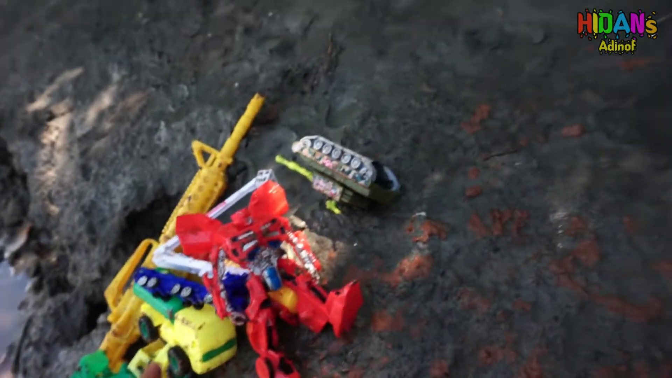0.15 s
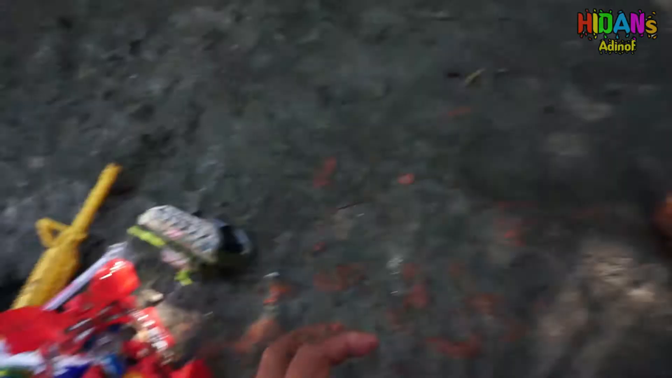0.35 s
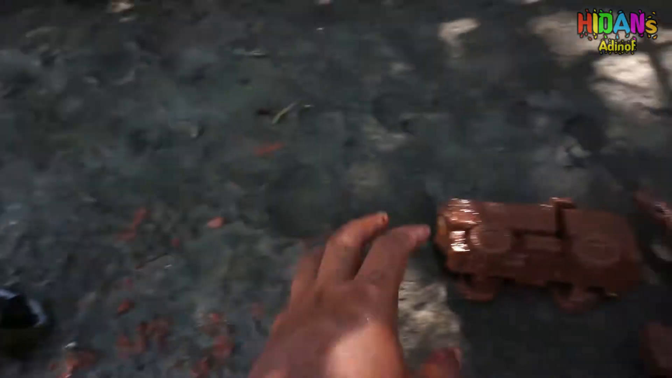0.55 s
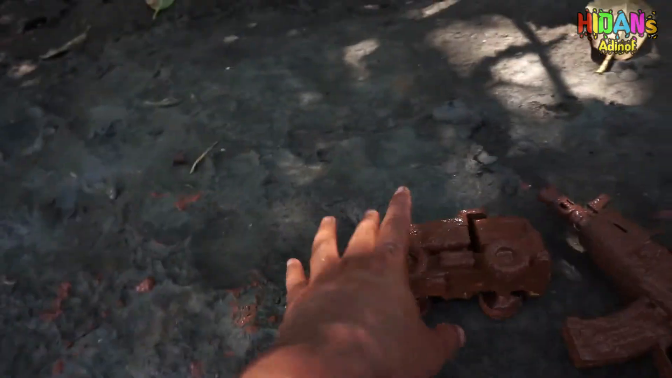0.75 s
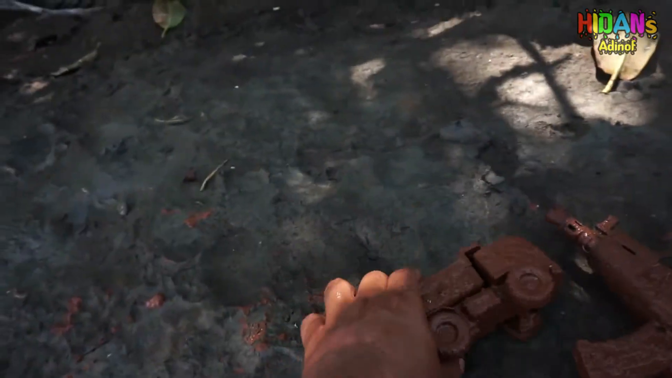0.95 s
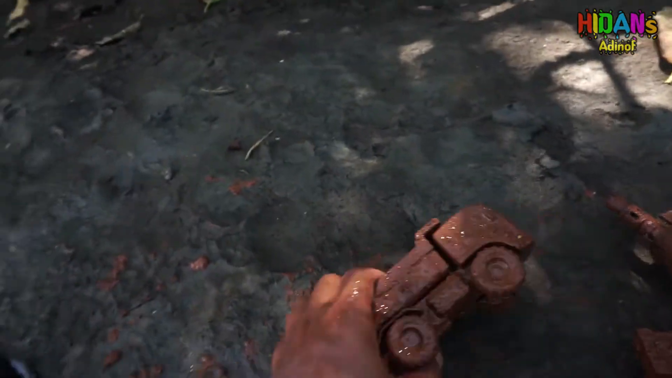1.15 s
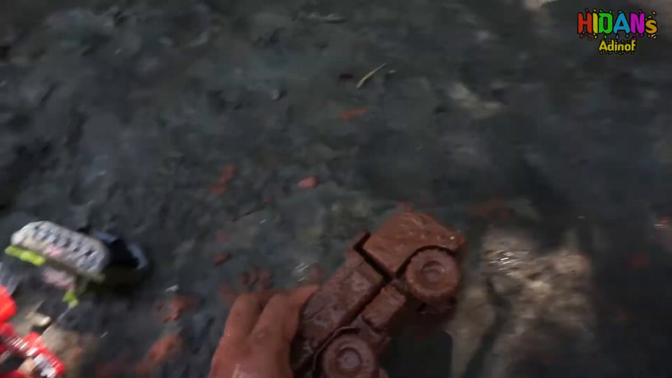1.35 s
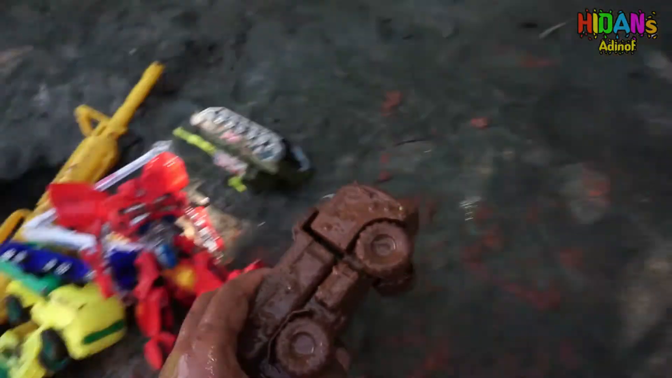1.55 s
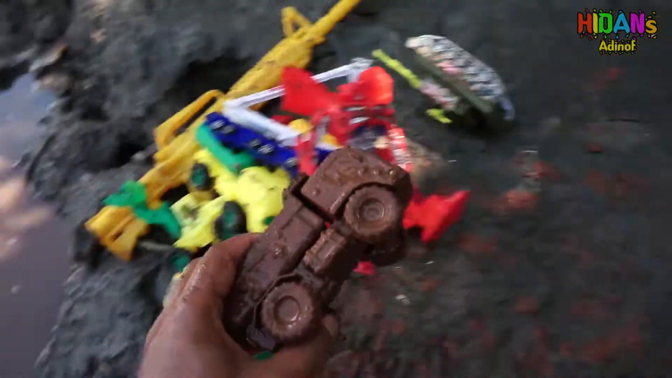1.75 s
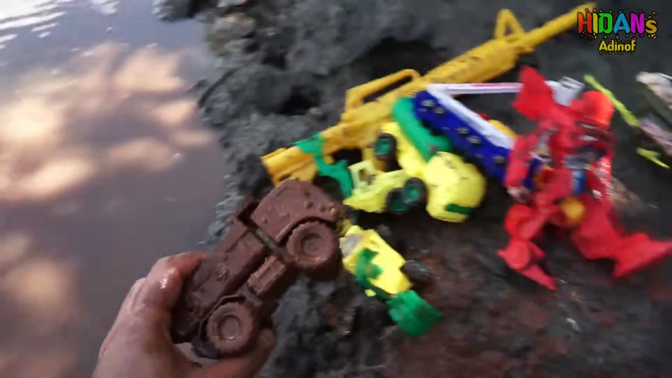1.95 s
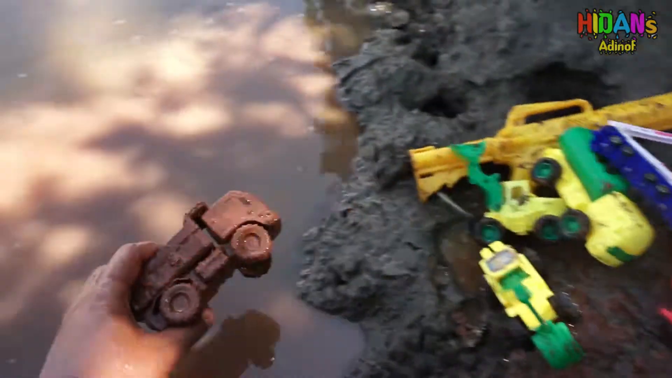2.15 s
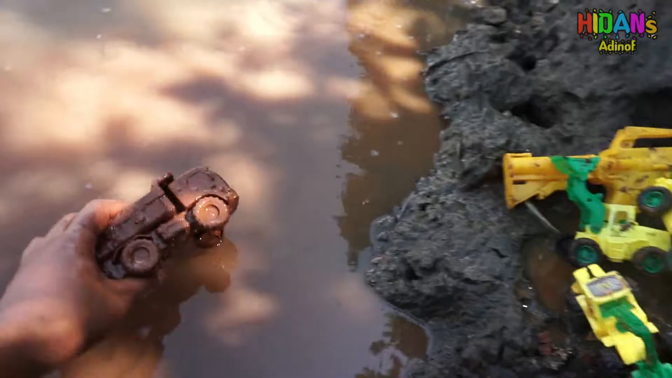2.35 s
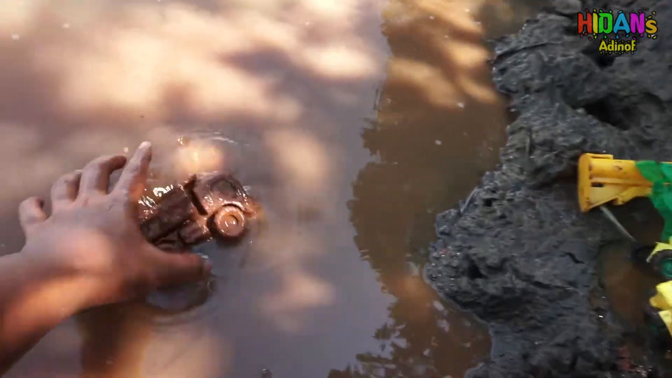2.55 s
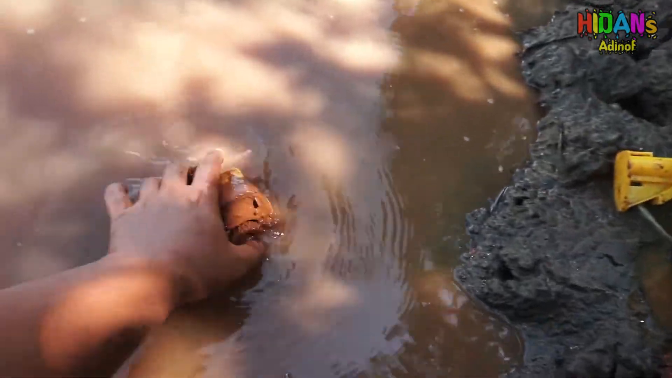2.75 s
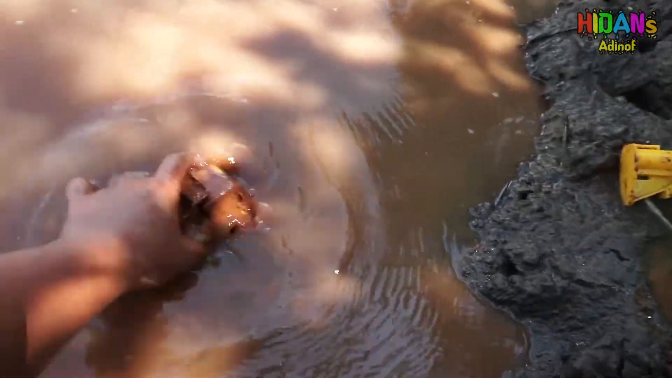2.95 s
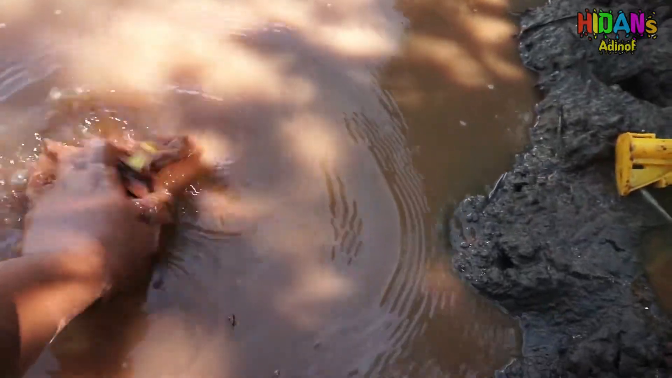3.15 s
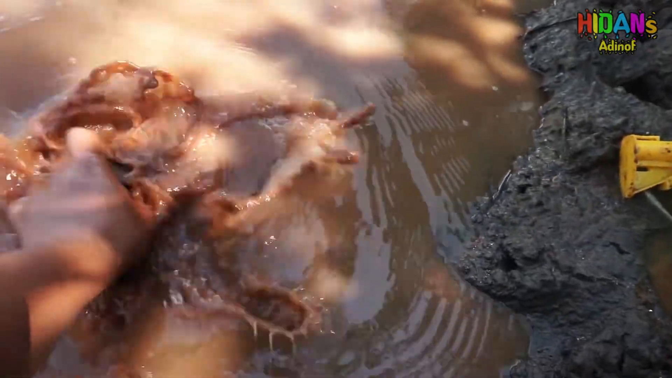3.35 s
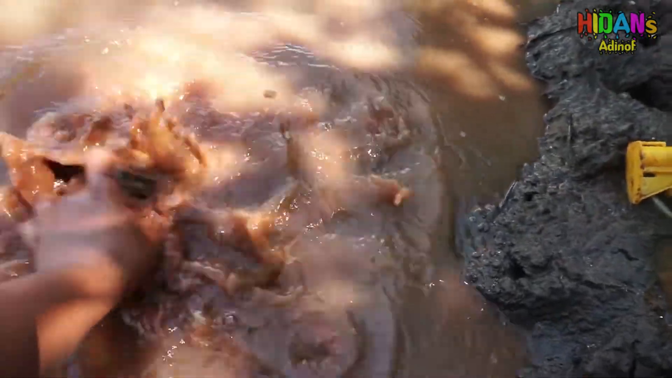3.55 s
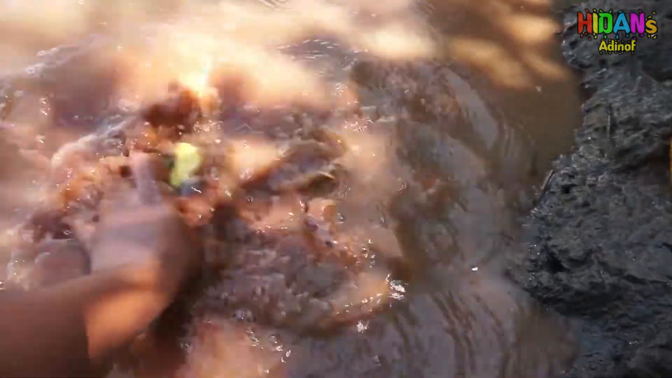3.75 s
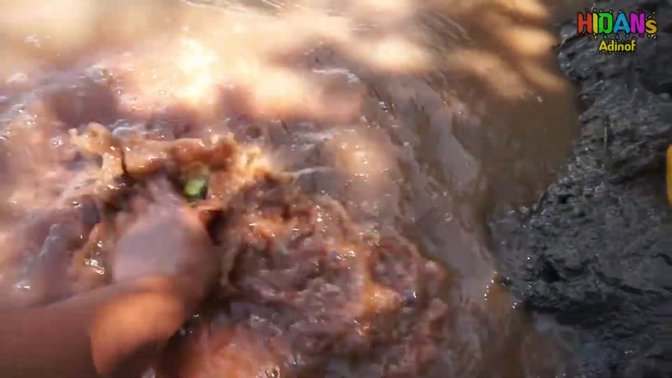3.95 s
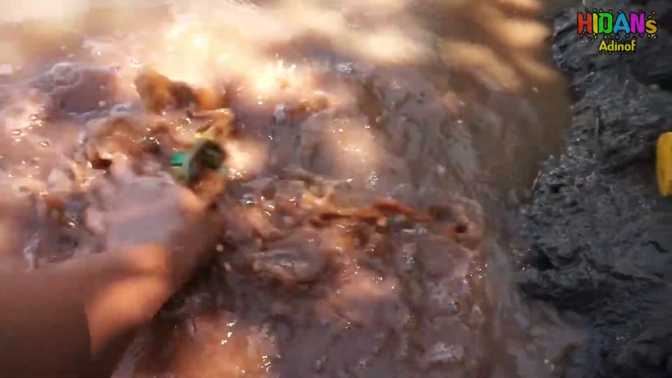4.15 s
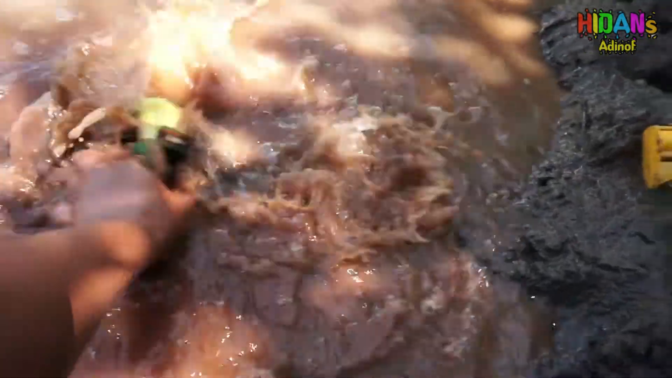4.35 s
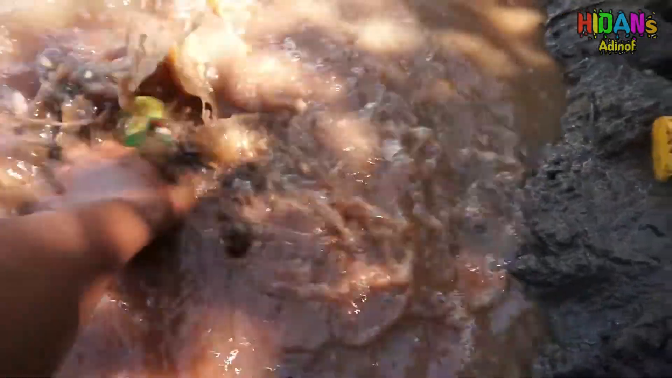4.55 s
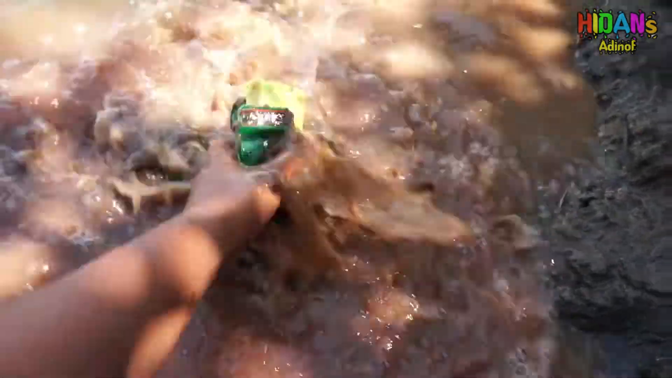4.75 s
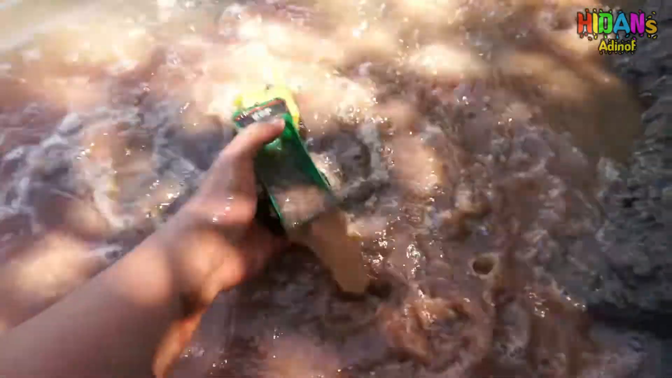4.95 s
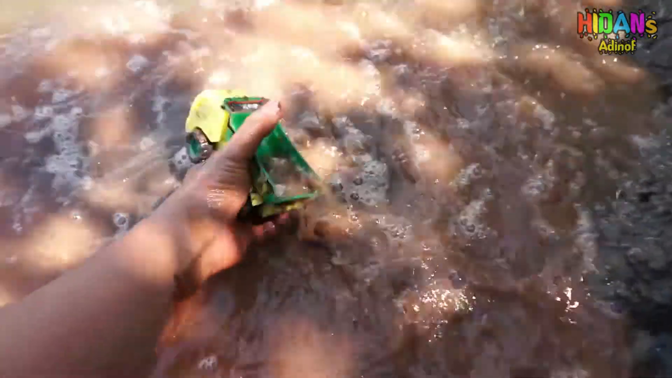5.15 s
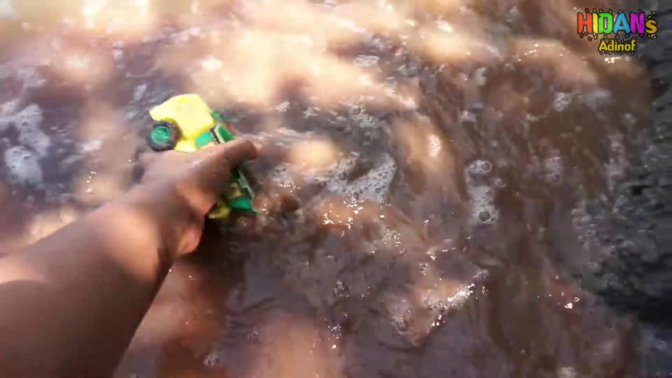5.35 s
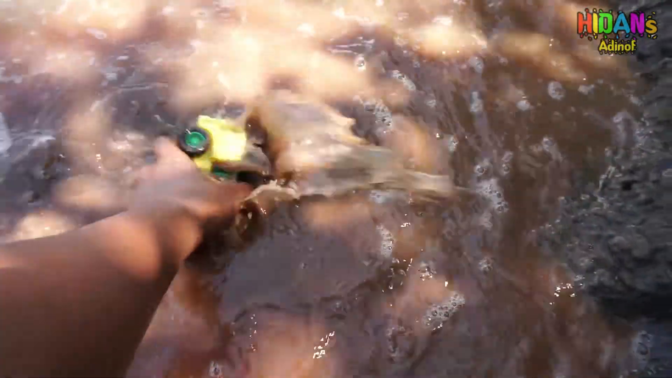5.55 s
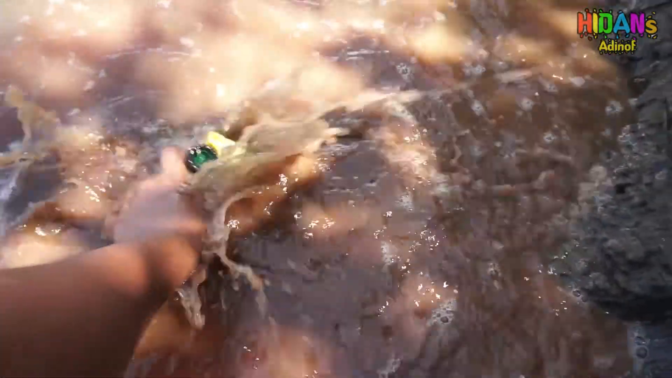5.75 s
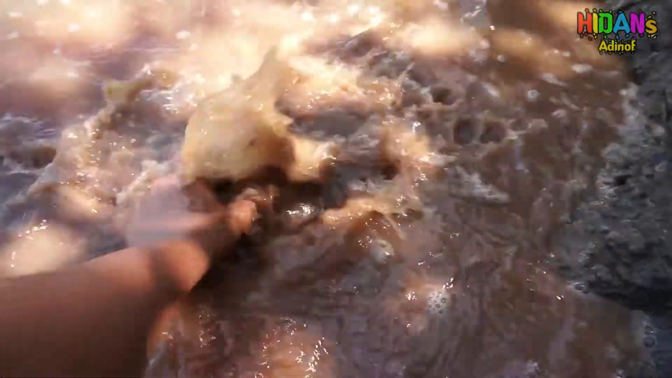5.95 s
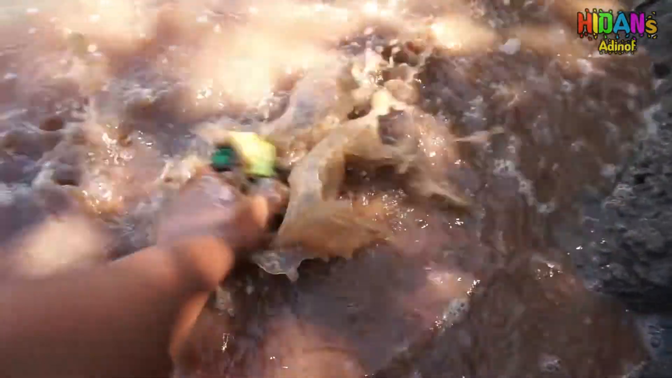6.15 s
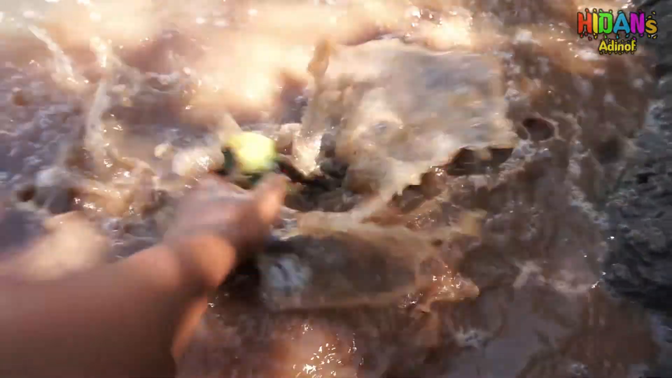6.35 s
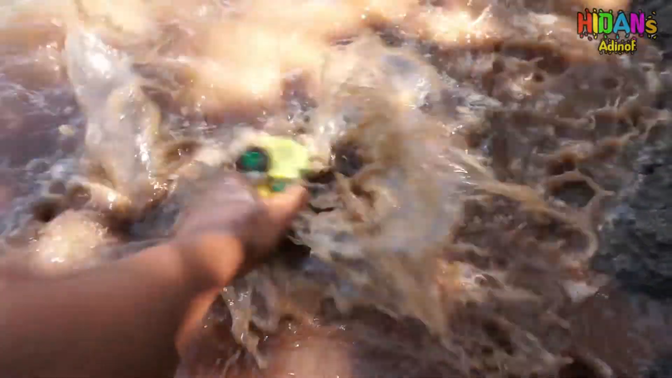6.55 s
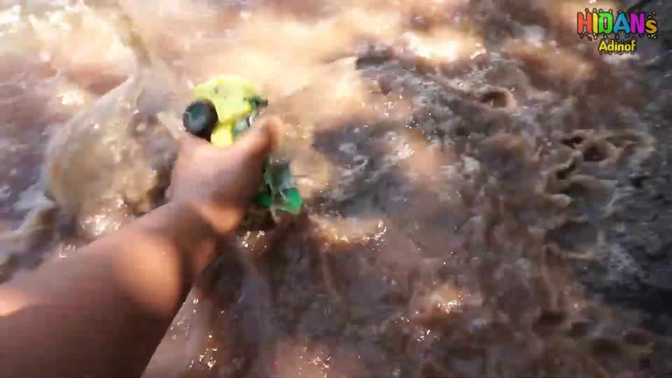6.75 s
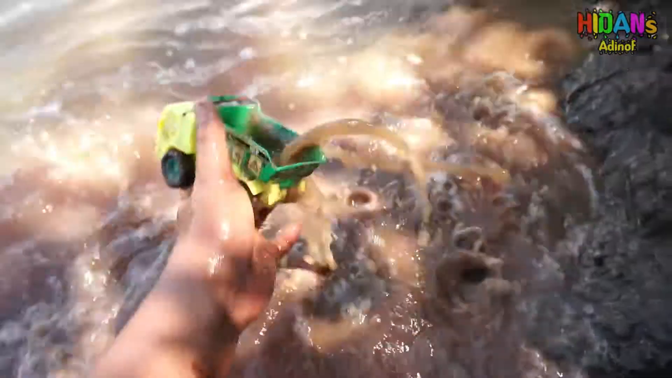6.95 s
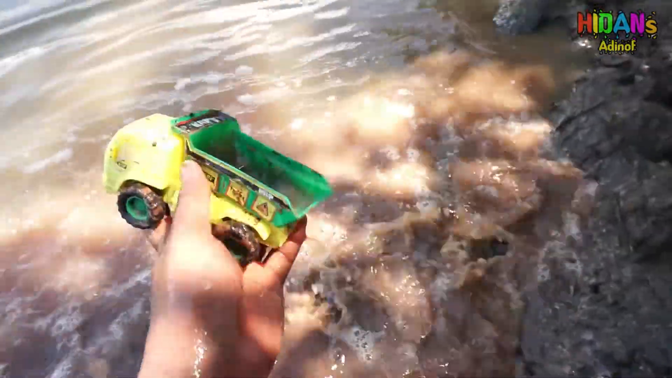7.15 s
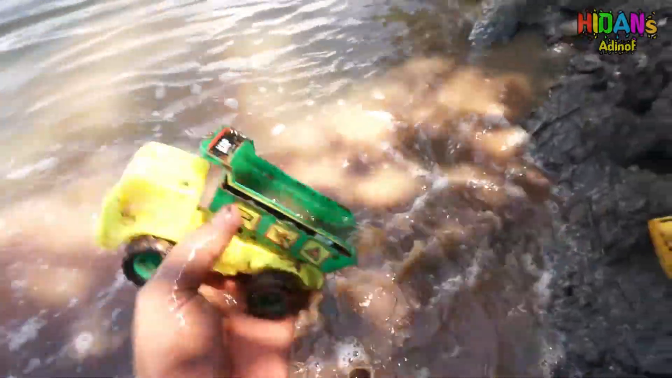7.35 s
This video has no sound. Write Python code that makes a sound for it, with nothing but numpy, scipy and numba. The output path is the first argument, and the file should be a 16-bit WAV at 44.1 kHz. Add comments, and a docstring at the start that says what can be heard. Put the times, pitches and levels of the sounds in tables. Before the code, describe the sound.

Outdoors beside shallow muddy water, soft low traffic and steady airy leaves lie far behind. From 0 to about 1 s a thin hiss with ringing metallic bands fades out, while hollow plastic toys tick and knock lightly, clearest near 0.15 and 0.35 s. Around 0.9 s fingers rustle faintly on a muddy truck. A faint high insect buzz passes at 1.3-1.6 s, with barely audible cricket and distant bird tones. At 2.5 s the truck plops into water, left of the close handheld stereo microphone. Small splashes start near 3.1 s and become fast, vigorous swishing from 3.5 to 4.9 s, with deep gurgles, bright spray, bubbles, snapping drops and dull plastic knocks. It calms around 5.1-5.4 s, surges again from 5.5 to 6.8 s, then thins into light splashes and drips until 7.5 s.

```python
"""First a ringing hiss fades over far traffic while plastic toys tick and knock on a muddy bank.
Fingers rustle on a muddy toy truck; then it is dipped and shaken in shallow water, left of a hand-held camera.
Splashes are bands of noise and small random bubbles, driven by level curves; single bubbles, drops and
plastic knocks are short damped sines. Insects and a far bird are thin unsteady tones and narrow noise;
traffic, air and leaves are coloured stereo noise. The microphone keeps nothing above its band limit."""
import sys
import numpy as np
from scipy import signal
from scipy.fft import rfft, irfft, next_fast_len
from scipy.io import wavfile
from scipy.ndimage import map_coordinates
from numba import njit

SR = 44100
rng = np.random.default_rng(int(sys.argv[2]) if len(sys.argv) > 2 else 0)


def store_wav(level_fs):
    """Save 16-bit WAV to argv[1]."""
    pcm = np.round(np.clip(np.atleast_2d(level_fs), -1, 1) * 32767)
    wavfile.write(sys.argv[1], SR, pcm.T.astype(np.int16))


N = 330309  # length [samples]
CENTRED = [(1000, 0)]  # no lead between left and right: (frequency [Hz], phase [rad])


# thuds, splashes and the churn between them, all before the unevenness of the water:
# each plunge of the truck makes the water thump: (time [s], level [dB])
PLUNGE_EVENTS = [(2.464, -41.5), (2.528, -47), (2.588, -45), (3.469, -39.5), (3.567, -35.5), (3.681, -32.5),
                 (3.784, -39), (3.873, -39), (4.076, -34.5), (4.276, -30), (4.374, -31.5), (4.471, -36),
                 (4.572, -27), (5.675, -37.5), (5.761, -34), (5.858, -35), (5.968, -31.5), (6.097, -38.5),
                 (6.155, -38), (6.236, -55), (6.365, -40), (6.47, -40), (6.568, -48), (6.725, -39),
                 (7.404, -46)]
# each shake of the hand throws a splash: (start [s], length [s], gurgle level [dB], spray level [dB])
SPLASH_EVENTS = [(2.474, 0.0073, -35, -32), (2.562, 0.041, -50, -52), (2.985, 0.045, -44, -58),
                 (3.144, 0.04, -30.5, -40.5), (3.247, 0.044, -38, -46), (3.298, 0.018, -35, -36.5),
                 (3.344, 0.043, -47, -30.5), (3.395, 0.022, -49, -36), (3.543, 0.055, -32, -34),
                 (3.674, 0.018, -27.5, -35), (3.768, 0.019, -32, -31.5), (3.87, 0.0082, -27.5, -29),
                 (3.948, 0.032, -42.5, -31), (4.057, 0.016, -33.5, -32), (4.168, 0.065, -36.5, -31),
                 (4.251, 0.042, -27, -30.5), (4.361, 0.027, -26, -26.5), (4.467, 0.032, -29, -29.5),
                 (4.581, 0.041, -29.5, -25), (4.7, 0.044, -40, -30), (4.835, 0.023, -43, -30),
                 (4.903, 0.028, -39, -37.5), (5.008, 0.029, -40.5, -37), (5.193, 0.022, -55, -51),
                 (5.25, 0.03, -59, -49), (5.34, 0.019, -60, -40.5), (5.49, 0.032, -39.5, -30),
                 (5.549, 0.051, -37.5, -32.5), (5.658, 0.02, -36.5, -26), (5.783, 0.071, -27, -34),
                 (5.855, 0.017, -35, -26.5), (5.963, 0.035, -31.5, -34), (6.043, 0.044, -32, -27.5),
                 (6.121, 0.061, -32.5, -30.5), (6.229, 0.021, -36, -23.5), (6.338, 0.024, -28.5, -32),
                 (6.394, 0.017, -33, -55), (6.455, 0.039, -35, -25.5), (6.531, 0.11, -40, -28.5),
                 (6.602, 0.038, -30, -41), (6.674, 0.039, -33, -27.5), (6.725, 0.013, -51, -24),
                 (6.832, 0.041, -43, -29.5), (6.946, 0.028, -45, -43), (7.083, 0.033, -43, -35.5),
                 (7.122, 0.017, -43, -33), (7.175, 0.072, -55, -35.5), (7.388, 0.017, -51, -38.5),
                 (7.453, 0.022, -46, -37)]
# the water keeps churning between splashes: (time [s], gurgle level [dB], spray level [dB])
CHURN_LEVELS = [(2.9, -50, -65), (3.0, -51, -58), (3.08, -44.5, -47), (3.21, -40.5, -46.5),
                (3.31, -39.5, -43), (3.45, -36.5, -37), (3.97, -37.5, -44.5), (4.2, -32.5, -35.5),
                (4.41, -36.5, -32.5), (4.79, -43, -33.5), (5.05, -49, -38), (5.29, -50.5, -39),
                (5.64, -41.5, -45), (5.98, -40.5, -34.5), (6.4, -44, -31.5), (6.58, -44, -29),
                (6.79, -43, -37.5), (6.88, -43, -36), (7.09, -69, -35.5), (7.49, -46, -42.5)]
# colours of the four layers, deepest first: (frequency [Hz], density [dB per Hz])
THUMP_COLOUR = [(100, -43), (170, 8), (280, -1.5), (393, 5), (480, 1), (520, -10), (680, -44), (1140, -120)]
GURGLE_COLOUR = [(310, -42), (520, -15), (673, 3), (1100, 1.5), (1260, -1.5), (1700, -9), (2210, -32),
                 (3740, -120)]
SLOSH_COLOUR = [(760, -10.5), (1300, -2), (1600, 0.5), (2020, 0.5), (2450, 3), (2720, -0.5), (3490, -6),
                (4500, -9), (5850, -8), (9900, -120)]
SPRAY_COLOUR = [(2060, -3), (3500, 4), (4870, 2.5), (6560, 1.5), (11400, 2.5), (13400, 0.5), (15100, -5),
                (15700, -1), (16200, 4), (16500, -30)]
SLOSH_FROM_SPRAY, SLOSH_DB = 0.59, 0.5  # the slosh level lies this share of the way from gurgle to spray
PLUNGE_S, THUMP_UNDER_GURGLE_DB = 0.011, 14.5


def stirred_water():
    """Thump, gurgle, slosh and spray: each shake drives deep and bright water along its own level curve."""
    t = np.arange(N) / SR
    gate, low_db, high_db = curves(CHURN_LEVELS)
    closed_db = -80 * (1 - gate)
    low_db, high_db = low_db + closed_db, high_db + closed_db
    start, length, gurgle_db, spray_db = np.transpose(SPLASH_EVENTS)
    plunge_s, plunge_db = np.transpose(PLUNGE_EVENTS)

    def between(low, high):
        return SLOSH_DB + low + SLOSH_FROM_SPRAY * (high - low)

    # slopes are (rise, fall) in dB per second
    thump = surges(plunge_s, PLUNGE_S, plunge_db, (380, 700), low_db - THUMP_UNDER_GURGLE_DB)
    gurgle = surges(start, length, gurgle_db, (730, 350), low_db)
    slosh = surges(start, length, between(gurgle_db, spray_db), (1050, 274), between(low_db, high_db))
    spray = surges(start, length, spray_db, (1050, 320), high_db)
    wash = stirred(thump, lean("thump", t), THUMP_COLOUR, count=900, centre_hz=341, octaves=0.88,
                   cycles=7.7, uneven_db=3.0, grain_share=0.79, flutter_db=-1.5)
    wash += stirred(gurgle, lean("gurgle", t), GURGLE_COLOUR, count=1700, centre_hz=894, octaves=1.8,
                    cycles=12.4, uneven_db=2.0, grain_share=0.61, flutter_db=2.5)
    wash += stirred(slosh, lean("slosh", t), SLOSH_COLOUR, count=3500, centre_hz=2400, octaves=2.126,
                    cycles=20.7, uneven_db=3.0, grain_share=0.53, flutter_db=1.5)
    wash += stirred(spray, lean("spray", t), SPRAY_COLOUR, count=12000, centre_hz=7660, octaves=2.54,
                    cycles=7.6, uneven_db=2.5, grain_share=0.48, flutter_db=2.0)
    return wash


# single bubbles: (time [s], relative level [dB], pitch [Hz])
SINGLE_BUBBLES = [(2.456, -23.5, 453), (2.524, -27, 399), (2.581, -43, 404), (4.265, -26, 406),
                  (2.457, -20.5, 787), (2.482, -20, 1415), (2.519, -31, 813), (2.561, -32, 720),
                  (2.773, -27, 1420), (2.906, -42, 840), (2.961, -29, 1340), (2.998, -29, 686),
                  (3.075, -32, 1260), (3.118, -24, 830), (3.252, -17.5, 817), (3.351, -12.5, 876),
                  (3.453, -25, 870), (3.469, -11.5, 1005), (3.531, -22, 1460), (3.619, -24, 1370),
                  (3.668, -14.5, 670), (3.739, -23, 680), (3.757, -13, 770), (3.861, -23, 1090),
                  (3.999, -34, 1140), (4.047, -29, 1090), (4.146, -31, 1080), (4.165, -33, 780),
                  (4.235, -27, 972), (4.255, -20, 625), (4.362, -9.5, 1044), (4.39, -12, 961),
                  (4.445, -21, 674), (4.465, -21, 1080), (4.528, -17, 670), (4.555, -16, 730),
                  (4.59, -20, 867), (4.693, -22, 1016), (4.79, -21.5, 742), (4.829, -26, 702),
                  (4.975, -28, 663), (5.005, -25, 1460), (5.062, -26, 865), (5.167, -23, 1294),
                  (5.34, -30, 730), (5.363, -24, 1290), (5.411, -34, 1190), (5.553, -22.5, 754),
                  (5.65, -25, 740), (5.667, -14.5, 918), (5.705, -20, 1060), (5.754, -16, 740),
                  (5.849, -20, 1430), (5.982, -19, 1140), (6.038, -20, 1510), (6.142, -18, 1070),
                  (6.16, -17, 697), (6.224, -19, 1260), (6.316, -23, 1370), (6.34, -13, 1330),
                  (6.393, -20, 697), (6.462, -20, 960), (6.569, -8.5, 970), (6.609, -13, 1450),
                  (6.702, -24, 888), (7.079, -21, 1490), (7.164, -33, 1090), (7.257, -27.5, 1060),
                  (2.4572, -24, 2580), (2.4811, -19, 1620), (2.774, -28, 2160), (3.1187, -26, 2310),
                  (3.1352, -20, 2430), (3.1576, -16, 2420), (3.2414, -21, 2450), (3.2903, -17, 3080),
                  (3.3068, -14.5, 1910), (3.5098, -16, 2170), (3.5457, -19, 1480), (3.6724, -19, 2300),
                  (3.7572, -22, 1820), (3.7647, -14, 1950), (3.861, -15, 1650), (3.9229, -16, 1740),
                  (3.9987, -22, 2210), (4.071, -21, 1740), (4.103, -9.5, 2240), (4.1643, -13, 2270),
                  (4.1943, -11, 2310), (4.2137, -14.5, 2290), (4.2566, -15, 2300), (4.3624, -14, 1550),
                  (4.3923, -14.5, 1525), (4.4447, -24, 2360), (4.4562, -17, 1750), (4.4781, -19, 2590),
                  (4.5784, -20, 3670), (4.5948, -14, 2390), (4.6063, -12, 2160), (4.7021, -16, 2210),
                  (4.8508, -12.5, 3810), (4.9191, -23, 1550), (5.0024, -18, 1550), (5.1261, -28, 2510),
                  (5.191, -22.5, 2330), (5.2518, -21.5, 1800), (5.2858, -21, 3890), (5.4145, -22, 2620),
                  (5.4479, -21, 1730), (5.4928, -23, 2230), (5.5053, -9.5, 2960), (5.5696, -9, 2160),
                  (5.7527, -21, 1590), (5.8335, -17, 2600), (5.8505, -15, 1640), (6.0096, -16.5, 1620),
                  (6.0445, -10.5, 1680), (6.073, -14, 2370), (6.1603, -12, 1770), (6.2481, -13, 2500),
                  (6.3404, -17.5, 1790), (6.4092, -12, 2440), (6.4855, -6, 2820), (6.5539, -15, 2440),
                  (6.6088, -13, 1690), (6.6676, -15, 2380), (6.7479, -14, 3570), (6.8268, -27, 1940),
                  (7.0797, -19.5, 2280), (7.171, -16.5, 2050), (7.1919, -20, 2230), (7.2044, -16, 2900),
                  (7.3855, -17, 3750), (7.4214, -20, 3700)]
# hollows fill and drain, one pitch curve each: (time [s], pitch [Hz], relative level [dB])
GLOOP_CURVES = [
    [(5.24, 698, -54), (5.27, 690, -52), (5.3, 706, -43), (5.32, 865, -52), (5.335, 970, -60)],
    [(6.698, 756.5, -60), (6.702, 780, -18), (6.71, 957, -26.5), (6.718, 1170, -25), (6.726, 1280, -52)],
    [(4.712, 700, -59), (4.72, 713, -35), (4.733, 790, -36), (4.742, 815, -58)],
]
RING_S, RING_POWER = 0.033, 0.93  # t60 of a 1 kHz bubble; falls with pitch to this power


def bubbles():
    """Bubbles ring as damped sines; each comes with a crack and a few weaker neighbours."""
    s, db, hz = np.transpose(SINGLE_BUBBLES)
    t60 = RING_S * (1000 / hz) ** RING_POWER
    pan_db = np.where(hz < 1500, lean("gurgle", s), lean("slosh", s))
    rise = 1.8 * t60  # a bubble nearing the surface climbs in pitch while it rings
    ring = rings(s, db - 2.5, hz, t60, pan_db, rise, soft=0.46, scatter=1.0)
    neck = cracks(s, db - 7.5, 1.38 * hz, 5 / hz, pan_db, octaves=2.3, lasting=.001, soft=0.84, count=3)
    neighbours = cracks(s, db - 13.0, 1.128 * hz, 0.8 * t60, pan_db, octaves=0.91, lasting=18 / hz,
                        soft=0.37, count=3)
    gloops = sum(tone(gloop, throb_db=-2.5, rate=75) for gloop in GLOOP_CURVES) * sides(np.array([2.5]))
    return above(ring + neighbours, edge_hz=250) + above(neck, edge_hz=360) + gloops


# drops snap on water and plastic: (time [s], relative level [dB], centre [Hz])
DROP_SNAPS = [(2.4517, -36, 11100), (2.4734, -16.5, 8950), (2.532, -17.5, 12600), (3.0249, -34, 11200),
              (3.107, -32, 11000), (3.1216, -14, 12400), (3.1682, -17, 7640), (3.172, -9, 8300),
              (3.2526, -14.5, 9900), (3.2897, -19, 10700), (3.3362, -13, 9100), (3.3572, -16, 12100),
              (3.408, -14, 11600), (3.434, -17, 7290), (3.5242, -16.5, 7290), (3.5672, -12, 11500),
              (3.6026, -20.5, 11300), (3.8665, -12, 12700), (3.875, -10.5, 7910), (3.9564, -12, 9210),
              (3.9851, -12, 8800), (4.1028, -20, 6520), (4.1648, -23, 6160), (4.2646, -19, 5300),
              (4.3329, -22, 5220), (4.3496, -10, 5410), (4.3828, -7, 8970), (4.474, -11, 7300),
              (4.5644, -18, 5010), (4.744, -9, 8100), (4.7687, -16, 9560), (4.8143, -20, 12700),
              (4.8312, -9, 11200), (4.8498, -8.5, 8000), (4.8982, -13, 12600), (4.9193, -8.5, 5800),
              (4.943, -12.5, 11900), (4.9725, -19, 7710), (5.2858, -23, 5080), (5.4938, -10.5, 11000),
              (5.6514, -13, 12800), (5.6682, -11, 7050), (5.8515, -9.5, 7900), (5.8833, -14.5, 10500),
              (6.0246, -21, 9980), (6.0381, -17, 7370), (6.1443, -10, 11500), (6.2457, -13.5, 10200),
              (6.2755, -14, 7040), (6.294, -9.5, 8770), (6.3294, -14.5, 8580), (6.3553, -16, 8450),
              (6.4135, -7, 10500), (6.4314, -18, 10700), (6.4683, -12, 5010), (6.526, -11, 11300),
              (6.5933, -17, 7350), (6.6177, -20, 12200), (6.6823, -16, 8880), (6.7015, -14.5, 7740),
              (6.738, -13, 5220), (6.946, -18, 7670), (6.9909, -13.5, 11400), (7.0225, -16, 6330),
              (7.0565, -9.5, 12500), (7.09, -9, 10700), (7.126, -11, 6460), (7.1805, -28, 5010),
              (7.1923, -16, 5420), (7.339, -19.5, 8500), (7.385, -22, 10600), (7.4716, -18, 12600)]


def drops():
    """Each drop is a cluster of very short bright rings with a duller slap."""
    s, db, hz = np.transpose(DROP_SNAPS)
    snaps = cracks(s, db - 11, hz, 0.0056, lean("spray", s), octaves=1.3, lasting=.0008, soft=0.37, count=12)
    slaps = cracks(s, db - 14, 2800, 0.0027, lean("spray", s), octaves=1.3, lasting=.001, soft=.3, count=3)
    return above(snaps, edge_hz=2900) + above(slaps, edge_hz=1200)


def water():
    """The stirred layers with the single bubbles and drops that stand out, cleared of deep bass."""
    return above(stirred_water() + bubbles() + drops(), edge_hz=186)


# water slaps the hollow plastic: (time [s], relative level [dB])
PLASTIC_KNOCKS = [(2.4573, -22), (2.7741, -13.5), (3.1577, -15), (3.5458, -9), (3.6684, -13), (3.7564, -14),
                  (3.8606, -17), (4.1031, -13), (4.1639, -17), (5.006, -10), (5.5054, -11), (5.5692, -10),
                  (5.7528, -26), (5.8491, -17), (6.0384, -18), (6.0447, -8), (6.1599, -7), (6.3405, -8),
                  (7.1921, -17), (7.3851, -22)]
KNOCK_HZ, KNOCK_T60_S, TICK_HZ, TICK_DB = 2100, 0.0049, 7930, -23.5


def knocks():
    """Water slaps the plastic: a dull click with almost no ring and a faint bright tick."""
    s, db = np.transpose(PLASTIC_KNOCKS)
    click = cracks(s, db - 7.5, KNOCK_HZ, KNOCK_T60_S, lean("slosh", s), octaves=1.0, lasting=0.00027,
                   soft=0.19, count=2)
    tick = cracks(s, db + TICK_DB, TICK_HZ, KNOCK_T60_S, lean("spray", s), octaves=1.65, lasting=.002,
                  soft=0.38, count=6)
    return above(click + tick, edge_hz=460)


# toys touch on the bank: (time [s], relative level of the hollow body [dB], pitch [Hz], t60 [s],
# left over right [dB], relative level of the tick [dB])
TOY_TOUCHES = [(0.019, -42.5, 872, 0.043, 1, -64), (0.045, -41.5, 1920, 0.029, 8, -64),
               (0.087, -55, 1920, 0.04, 7, -49), (0.133, -41, 800, 0.074, 2, -44),
               (0.154, -35.5, 890, 0.062, 7, -51), (0.167, -35, 813, 0.1, 2.5, -51),
               (0.299, -59, 2020, 0.04, 7, -58), (0.342, -32, 846, 0.04, 10, -37.5),
               (0.854, -48, 1620, 0.036, -1.0, -53), (0.895, -43.5, 1480, 0.029, 3, -45),
               (0.933, -52, 1930, 0.037, 3, -56), (1.024, -49, 603, 0.035, 4, -58),
               (1.072, -42.5, 1450, 0.025, 3, -66)]
# fingers close on the muddy truck: (time [s], relative level [dB])
RUSTLE_LEVELS = [(0.82, -60), (0.894, -47), (0.978, -65), (1.064, -61), (1.076, -55), (1.088, -74),
                 (1.1, -70)]


def toys():
    """Each touch rings the hollow plastic briefly and makes a dry noisy tick; fingers rustle on the mud."""
    s, db, hz, t60, pan_db, tick_db = np.transpose(TOY_TOUCHES)
    body = rings(s, db, hz, t60, pan_db, rise=0, soft=0.89, scatter=.3)
    t = np.arange(SR // 20) / SR
    blows = np.zeros((2, N))
    blows[:, np.round(s * SR).astype(int)] = amp([db - 3.5, tick_db + 1.5])
    decays = amp(-60 * t / np.array([[.03], [.02]]))  # t60 [s] of knock and tick
    knock, tick = signal.fftconvolve(blows, decays, axes=1)[:, :N]

    def noise(hz, alike):
        gain = lambda f: 1 / (1 + (np.log2((f + 1) / hz) / 1.75) ** 4)
        return spread(rng.standard_normal((2, N)), gain, [(1000, alike)], CENTRED)

    gate, rustle_db = curves(RUSTLE_LEVELS)
    rustle = gate * amp(rustle_db - 3.5 + 3.4 * wobble(150)) * noise(1700, 0.34)
    return body + knock * noise(900, 0.48) + tick * noise(6100, 0.19) + rustle


# a ringing hiss that fades: (time [s], level [dB] before a slow wobble)
WHIRR_LEVELS = [(0.0, -48.5), (0.156, -47), (0.33, -49.5), (0.62, -54), (0.848, -58), (1.058, -71),
                (1.2, -76)]
# its broad colour: (frequency [Hz], density [dB per Hz])
WHIRR_COLOUR = [(530, -42), (900, -7), (1650, -8), (1770, -6), (2310, -1), (4390, -3), (5310, -7),
                (7410, -13.5), (12400, -21.5), (15500, -29)]
# its ringing bands: (centre [Hz], half width [Hz], lift over the broad colour [dB])
WHIRR_RESONANCES = [(2320, 60, 1), (3680, 53, 9), (3930, 100, 9), (4820, 74, 10), (5200, 52, 13),
                    (5440, 28, 16), (6170, 61, 16), (6940, 100, 15), (8090, 80, 11), (9230, 91, 14),
                    (10600, 100, 9), (11900, 200, 8)]


def whirr():
    """A hiss with narrow ringing bands dies away over the first second."""
    gate, db = curves(WHIRR_LEVELS)
    bands = lambda f: sum(lift / (1 + ((f - c) / w) ** 2) for c, w, lift in WHIRR_RESONANCES)
    gain = lambda f: amp(along(WHIRR_COLOUR, f) + bands(f))
    hiss = spread(rng.standard_normal((2, N)), gain, [(1000, 0.076)], CENTRED)
    return gate * amp(db + 1.5 * wobble(11.8)) * hiss


# a buzzing insect: (time [s], relative level of the low band [dB], of the high band [dB])
BUZZ_LEVELS = [(1.15, -86, -80), (1.178, -85, -88), (1.278, -80, -67), (1.332, -62, -57), (1.442, -55, -62),
               (1.538, -61, -59), (1.586, -70, -69), (1.672, -76, -88), (1.68, -86, -87)]


def buzzing_insect():
    """The buzz is a few thin partials that wander in pitch and stutter."""
    gate, low_db, high_db = curves(BUZZ_LEVELS)

    def part(hz, drift_hz):
        stutter = unit(amp(4.3 * wobble(55.1)))
        pitch = hz + drift_hz * (wobble(14) + wobble(120))
        return stutter * np.sin(2 * np.pi * np.cumsum(pitch) / SR)

    high = part(12000, 90) + part(11450, 170) + .6 * part(11050, 150)
    buzz = amp(low_db + 1.0) * part(9440, 60) + amp(high_db - 1.5) * high
    return gate * buzz * sides(np.array([1.2]))


# a cricket: (time [s], pitch [Hz], relative level [dB])
CRICKET_CURVE = [(.95, 5080, -80), (1.04, 5110, -70), (1.2, 5230, -76), (1.45, 5390, -71), (1.7, 5440, -71),
                 (1.87, 5470, -80), (2., 5520, -67), (2.15, 5470, -74), (2.45, 5620, -75)]


def cricket():
    """One thin throbbing tone along a pitch curve."""
    return tone(CRICKET_CURVE, throb_db=4.0, rate=37) * sides(np.array([2.]))


# a far bird, two notes: (time [s], pitch [Hz], relative level [dB])
BIRD_NOTES = [
    [(.48, 1480, -82), (.53, 1486, -68), (.62, 1470, -70), (.7, 1480, -80)],
    [(2.57, 1375, -56), (2.61, 1354, -69), (2.64, 1378, -57), (2.74, 1345, -58), (2.77, 1365, -60),
     (2.82, 1380, -63), (2.9, 1330, -71)],
]


def far_bird():
    """Two whistled notes, each a thin throbbing tone."""
    return sum(tone(note, throb_db=3.0, rate=34) for note in BIRD_NOTES) * sides(np.array([1.5]))


def insect_chorus():
    """Many insects merge into noise in one resonance, swelling slowly."""
    band = lambda f: 1 / (1 + ((f - 9700) / 350) ** 2)
    chorus = spread(rng.standard_normal((2, N)), band, [(1000, 0.33)], CENTRED)
    return amp(-71.0 + 1.4 * wobble(4.8)) * chorus


# far traffic: (frequency [Hz], density [dB per Hz])
TRAFFIC_COLOUR = [(12, -50), (20, -20), (54, -6.5), (77, -4), (103, -5), (149, -3.5), (232, -8.5),
                  (268, -12), (341, -11.5), (433, -18), (900, -36.5), (1170, -55), (1980, -120)]
# traffic comes and goes: (time [s], relative level [dB])
TRAFFIC_LEVELS = [(0.0, -48.5), (0.64, -47.5), (1.0, -48.5), (1.4, -48.5), (3.32, -49), (3.67, -48),
                  (5.11, -48.5), (6.09, -47.5), (6.44, -51.5), (7.13, -48), (7.49, -48)]
# likeness of left and right for distant sound: (frequency [Hz], correlation [-1 to 1])
DISTANT_ALIKE = [(60, 0.96), (180, 0.9), (400, 0.26), (800, -0.56), (1650, -0.35), (5000, 0.11),
                 (15000, 0.011)]


def traffic():
    """Distance leaves only the bass of the road: coloured noise that comes and goes."""
    gain = lambda f: amp(along(TRAFFIC_COLOUR, f))
    hum = spread(rng.standard_normal((2, N)), gain, DISTANT_ALIKE, [(60, 0.029), (400, -0.097)])
    return amp(curves(TRAFFIC_LEVELS)[1] + 1.5) * sides(np.array([.8])) * hum


# leaves and a far insect chorus: (frequency [Hz], density [dB per Hz])
AIR_COLOUR = [(410, -16), (700, -1.5), (1010, -4), (1640, -6), (1800, -7), (2190, -7.5), (5190, -9.5),
              (5610, -11.5), (5920, -15), (8990, -14), (9990, -15), (11500, -14.5), (16000, -20)]
AIR_DB = -56.5


def air():
    """Leaves and far insects blur into a steady coloured noise."""
    gain = lambda f: amp(along(AIR_COLOUR, f))
    return amp(AIR_DB) * spread(rng.standard_normal((2, N)), gain, DISTANT_ALIKE, CENTRED)


# where the hand is: (time [s], left over right [dB] before each layer's share)
HAND_SIDE = [(2.45, 9.5), (2.74, 9), (2.91, 12), (3.04, 14), (4.12, 10.5), (4.23, 6.5), (4.26, 11),
             (4.43, 7.5), (4.48, 12), (4.67, 6.5), (4.74, 8.5), (4.86, 0.0), (5.33, 7.5), (5.79, 10),
             (6.77, 2.0), (6.84, 12.5), (6.97, 0.5), (7.25, 1.0), (7.32, 5.5), (7.49, 3)]
# deeper layers lean less to the side: layer name -> share of the hand's lean [ratio]
LAYER_SHARE = {"thump": .15, "gurgle": 0.39, "slosh": 0.89, "spray": 1.11}


def lean(layer, s):
    """Left-right dB of a layer at time s."""
    return LAYER_SHARE[layer] * np.interp(s, *np.transpose(HAND_SIDE))


def surges(s, length, db, slopes, calm_db):
    """Level in dB: each event rises, holds and falls over a calm level, adding in power."""
    t = np.arange(0, N / SR + .01, .002)[:, None]
    rising = slopes[0] * np.clip(s - t, 0, None)
    falling = slopes[1] * np.clip(t - s - length, 0, None)
    events = np.sum(amp(db - rising - falling) ** 2, axis=1)
    power = np.interp(np.arange(N) / SR, t[:, 0], events)
    return 10 * np.log10(power + amp(calm_db) ** 2)


# likeness of left and right in the water's rush: (frequency [Hz], correlation [-1 to 1])
WATER_ALIKE = [(200, 0.89), (900, 0.99), (2000, 0.69), (4000, 0.13), (15000, 0.52)]
# phase by which left leads right: (frequency [Hz], lead [rad])
WATER_LEAD = [(100, 0.95), (430, -1.28), (1100, -1.19), (2300, -0.77), (3500, -0.65)]


def stirred(db, pan_db, colour, count, centre_hz, octaves, cycles, uneven_db, grain_share, flutter_db):
    """Many small random bubbles over a rush of noise, played by one stirring curve."""
    draw = rng.random((count, 5))
    hz = centre_hz * 2 ** (octaves * (draw[:, 1] - .5))
    size_db = -uneven_db * np.log(draw[:, 2] + 0.026)  # a few are much larger than the rest
    t60 = cycles * 2 ** (3.3 * (draw[:, 4] - .5)) / hz
    grain_pan_db = 15.0 * hz / (hz + 1500) * (draw[:, 3] - .5)
    grains = rings(draw[:, 0] * N / SR, size_db, hz, t60, grain_pan_db, rise=0.26, soft=0.29, scatter=1.33)
    # long lives give low bubbles more energy: a rising tilt evens that out
    grains = unit(filtered(grains, lambda f: amp(along(colour, f)) * f ** 1.28))
    rush = spread(rng.standard_normal((2, N)), lambda f: amp(along(colour, f)), WATER_ALIKE, WATER_LEAD)
    # calm and hard stirring mix bubbles and rush in different shares
    share = np.clip(grain_share - 0.026 * (db + 32.5), 0, .97)
    flutter = amp(flutter_db * (wobble(30) + 1.17 * wobble(90)))
    mix = np.sqrt(share) * grains + np.sqrt(1 - share) * rush
    return amp(db) * sides(pan_db) * unit(flutter) * mix


def rings(s, db, hz, t60, pan_db, rise, soft, scatter):
    """Stereo damped sines; soft = attack in cycles, scatter = size of the random left-right phase."""
    out = np.zeros((2, N))
    hz = np.minimum(hz, .45 * SR)
    # long waves reach both sides of the microphone alike
    shift = along(WATER_LEAD, hz) + scatter * hz / (hz + 2200) * rng.standard_normal(len(s))
    start = np.round(s * SR).astype(np.int64)
    attack = np.abs(soft) * SR / hz + 1e-3
    add(out, start, hz / SR, np.abs(t60) * SR, rise + 0 * s, attack, amp(db) * sides(pan_db), shift)
    return out


@njit
def add(out, start, hz, t60, rise, attack, gains, shift):
    """Damped sines with gliding pitch; all times in samples, pitch in cycles a sample."""
    for k in range(len(start)):
        for i in range(min(int(t60[k]), out.shape[1] - start[k])):
            u = i / t60[k]
            size = np.exp(-np.log(1000) * u) * (1 - np.exp(-(i + 1) / attack[k]))
            angle = 2 * np.pi * hz[k] * i * (1 + rise[k] * u)
            out[0, start[k] + i] += gains[0, k] * size * np.sin(angle + shift[k] / 2)
            out[1, start[k] + i] += gains[1, k] * size * np.sin(angle - shift[k] / 2)


def cracks(s, db, hz, t60, pan_db, octaves, lasting, soft, count):
    """A cluster of short rings scattered in level, pitch and, over lasting seconds, in time."""
    draw = rng.random((len(s), count, 3)) - .5
    late, louder, higher = draw[..., 0].ravel() + .5, draw[..., 1].ravel(), draw[..., 2].ravel()
    each = lambda v: np.repeat(v + 0 * s, count)
    return rings(each(s) + each(lasting) * late, each(db) + 6 * louder, each(hz) * 2 ** (octaves * higher),
                 each(t60), each(pan_db), rise=0.12, soft=soft, scatter=1.0)


def tone(rows, throb_db, rate):
    """A thin unsteady tone along a pitch curve."""
    gate, hz, db = curves(rows)
    phase = 2 * np.pi * np.cumsum(hz) / SR + 0.46 * wobble(60)
    return gate * amp(db + 2.5 + throb_db * wobble(rate)) * np.sin(phase)


def spread(pair, gain, alike, lead):
    """Two unrelated signals coloured and mixed to a stereo pair of rms 1."""
    turn = lambda hz: np.arccos(np.clip(along(alike, hz), -1, 1)) / 2
    mid, side = filtered(pair, lambda hz: gain(hz) * [np.cos(turn(hz)), np.sin(turn(hz))])
    half_lead = lambda hz: np.exp(.5j * along(lead, hz) * np.array([[1], [-1]]))
    return unit(filtered(np.array([mid + side, mid - side]), half_lead))


def above(x, edge_hz):
    """A steep high-pass."""
    return filtered(x, lambda f: f ** 4 / (f ** 4 + edge_hz ** 4))


def filtered(x, response):
    """The spectrum of x times a response of frequency."""
    m = next_fast_len(N + 8192)
    return irfft(rfft(x, m) * response(np.fft.rfftfreq(m, 1 / SR)), m)[..., :N]


def wobble(rate):
    """A smooth random curve, rate knots a second."""
    return map_coordinates(rng.standard_normal(int(N * rate / SR) + 4), [np.arange(N) * rate / SR])


def curves(rows):
    """A gate that is open inside the table's span, then one value per sample for each column."""
    s, *cols = np.transpose(rows)
    t = np.arange(N) / SR
    gate = np.clip(np.minimum(t - s[0], s[-1] - t) / 0.015 + 1, 0, 1)  # 15 ms fades outside the span
    return [gate] + [np.interp(t, s, c) for c in cols]


def along(points, hz):
    """(Hz, value) points on a log axis."""
    f, v = np.transpose(points)
    return np.interp(np.log(hz + 1), np.log(f + 1), v)


def sides(pan_db):
    """Left and right gains whose mean is 1; positive leans left."""
    ratio = amp(pan_db)
    return 2 * np.array([ratio, np.ones_like(ratio)]) / (1 + ratio)


def unit(x):
    """Scaled to rms 1."""
    return x / np.sqrt(np.mean(x ** 2) + 1e-20)


def amp(db):
    """dB to gain."""
    return 10 ** (np.asarray(db) / 20)


def scene():
    """All sources in the open air, from the water at hand to the distance."""
    near = water() + knocks() + toys() + whirr()
    wildlife = buzzing_insect() + cricket() + far_bird() + insect_chorus()
    return near + wildlife + traffic() + air()


def record(dry):
    """The camera's microphone keeps nothing above its band limit of 16.2 kHz."""
    return filtered(dry, lambda hz: np.clip((16200 - hz) / 500, 0, 1) ** 2)


dry = scene()
out = record(dry)
store_wav(out)
```